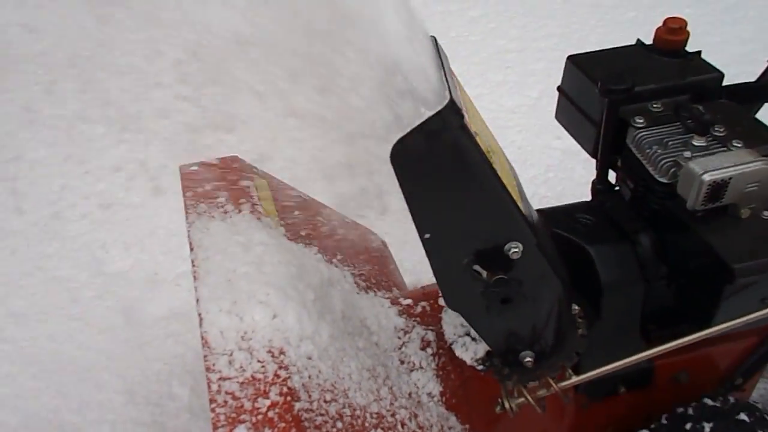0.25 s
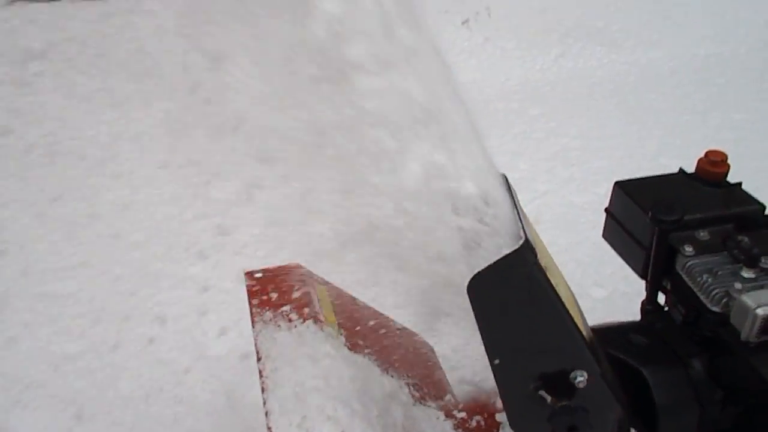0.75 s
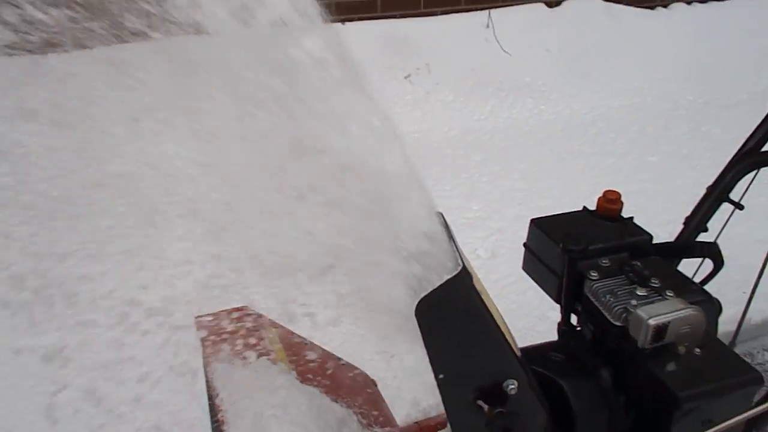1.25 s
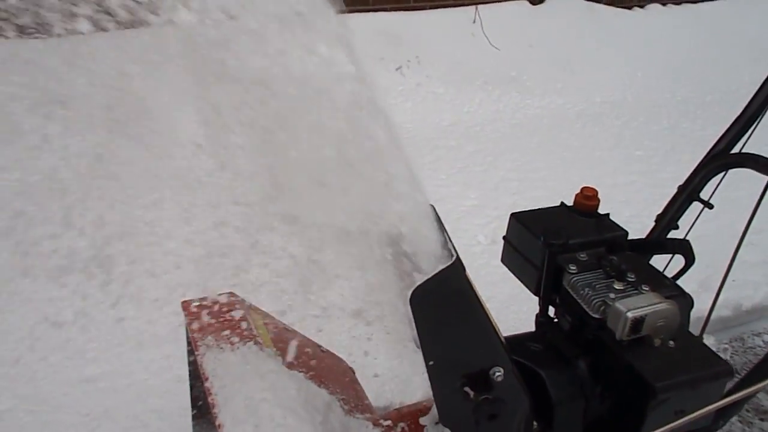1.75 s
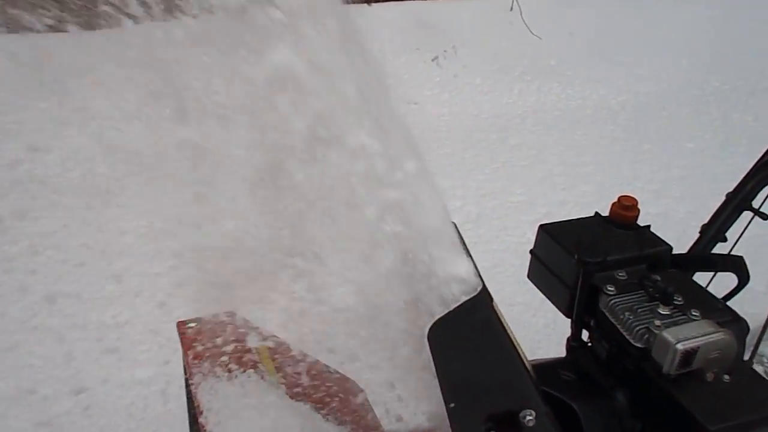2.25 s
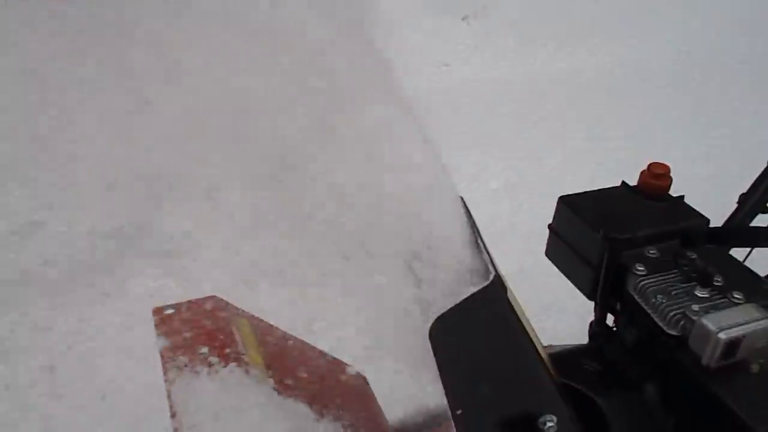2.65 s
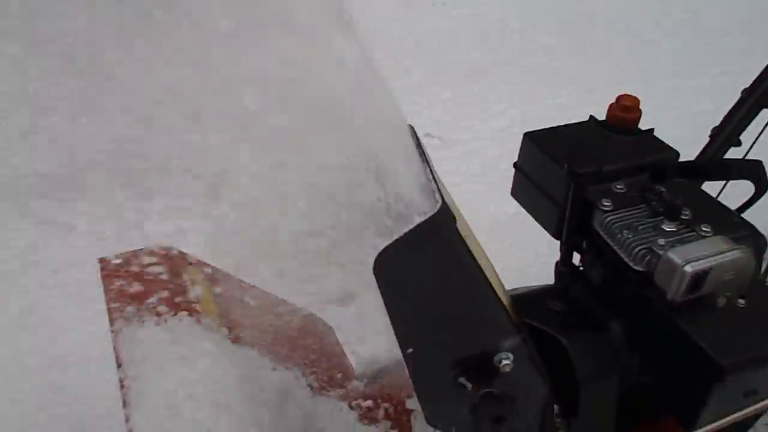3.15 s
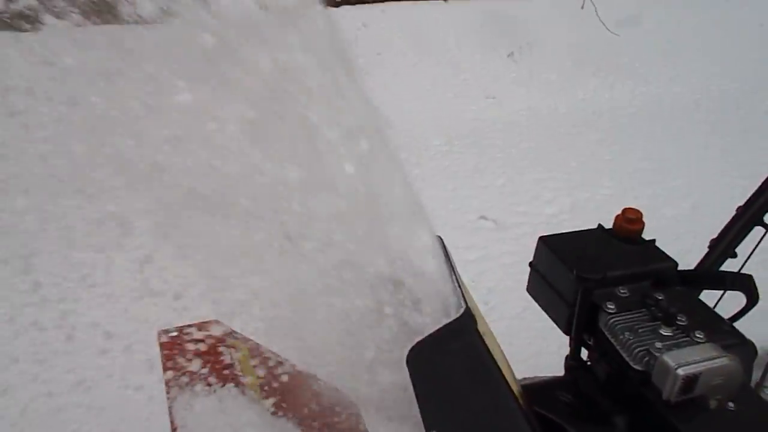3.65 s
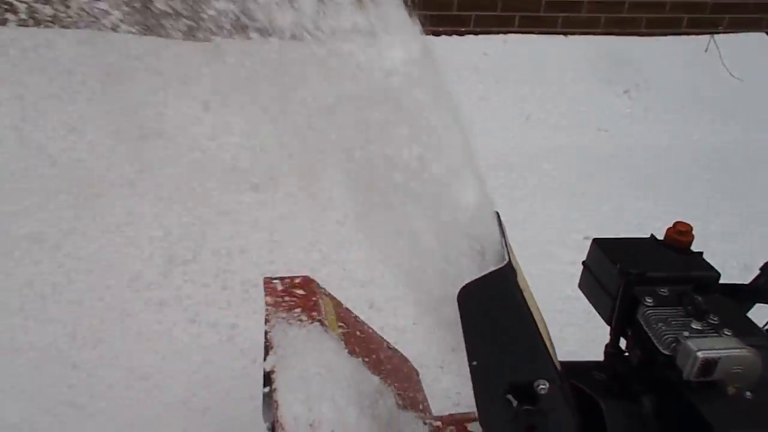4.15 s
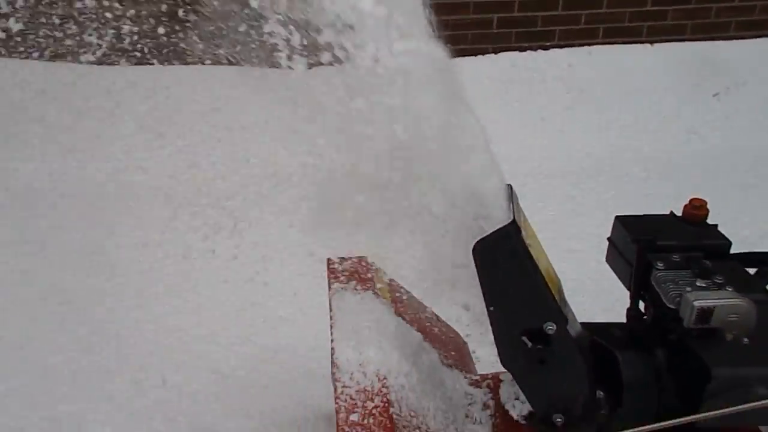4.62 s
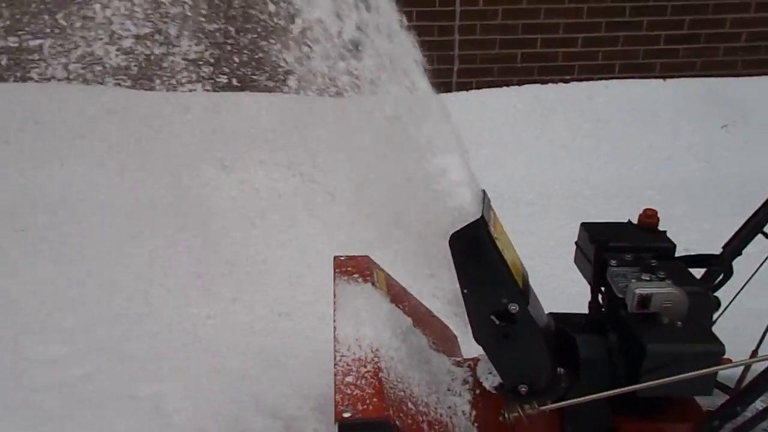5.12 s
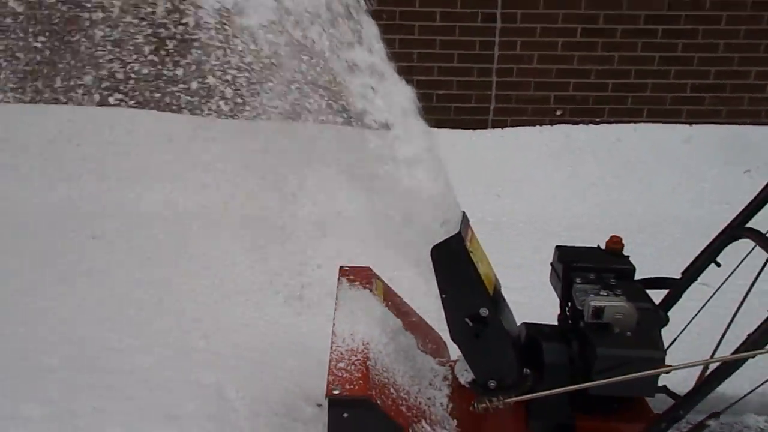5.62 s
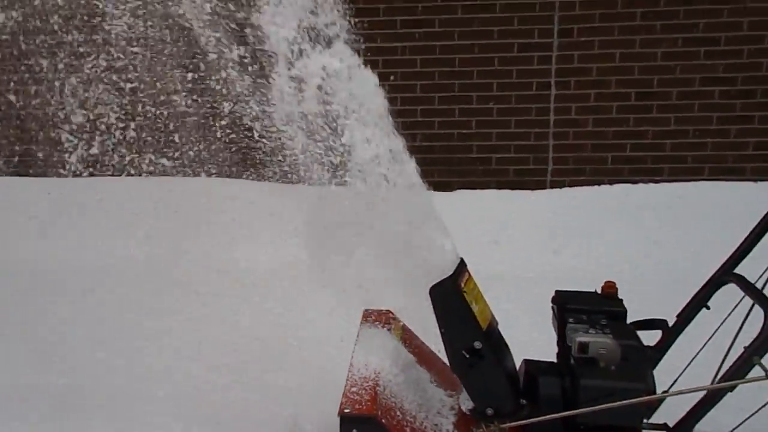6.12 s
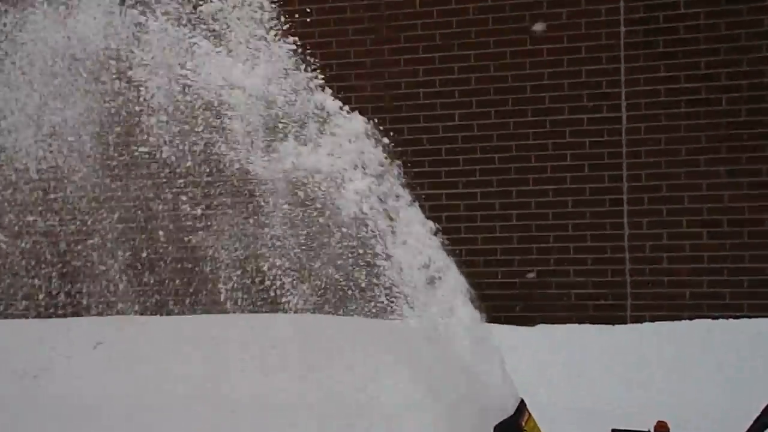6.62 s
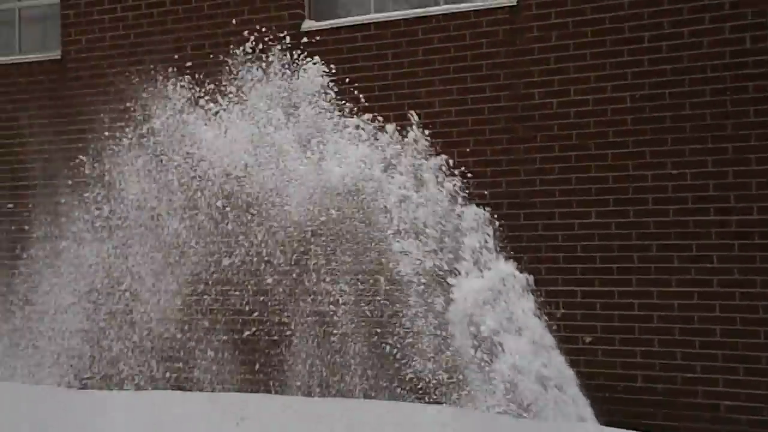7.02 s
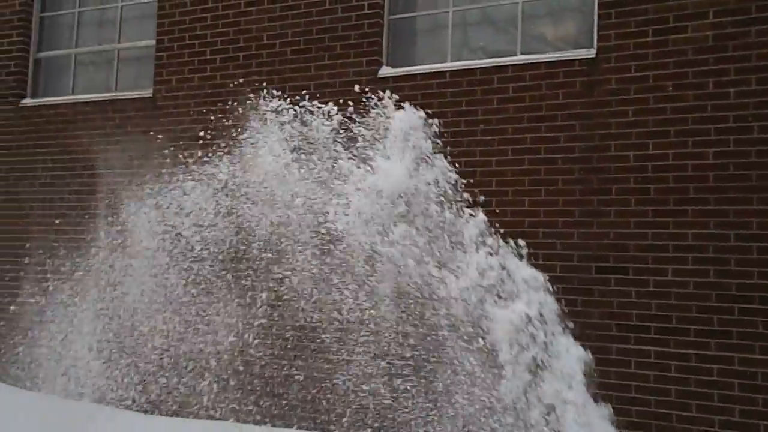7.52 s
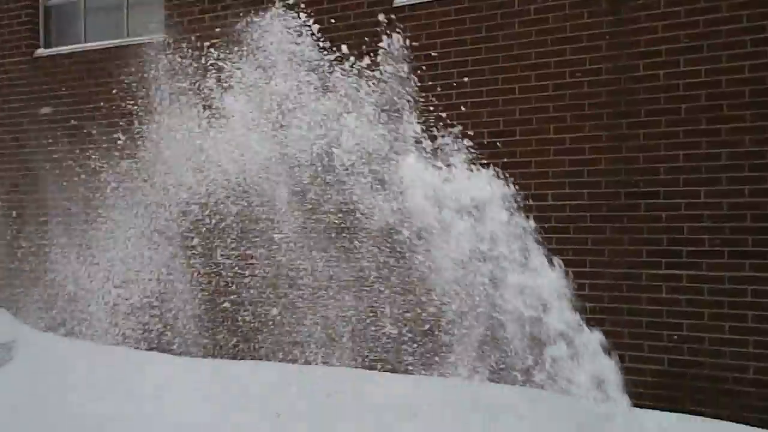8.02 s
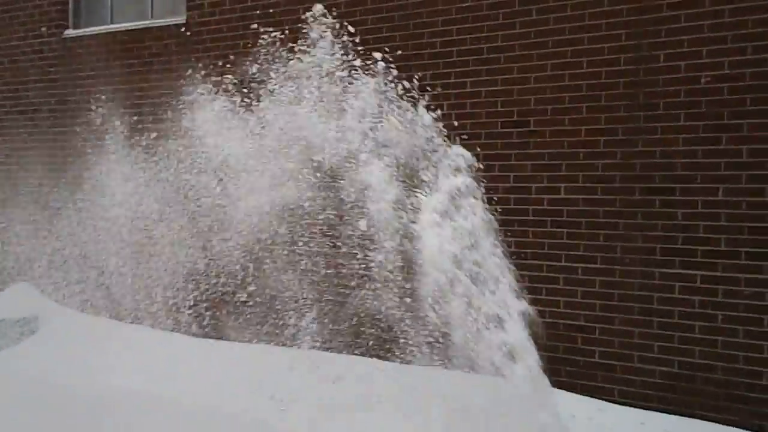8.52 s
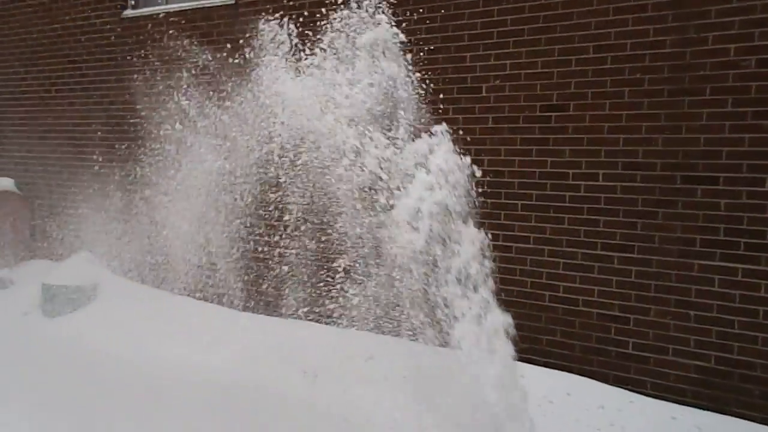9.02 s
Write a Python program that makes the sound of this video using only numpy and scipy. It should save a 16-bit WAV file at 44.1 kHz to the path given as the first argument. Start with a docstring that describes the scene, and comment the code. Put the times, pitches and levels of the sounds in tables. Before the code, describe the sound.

A snowblower runs close by outdoors for the whole nine seconds or so. Its single-cylinder engine holds a fast, even putter, about twenty-five beats a second, with thumping exhaust, metallic knocking and irregular bright snaps, most frequent in the first five seconds. Over it, snow rushes up the steel chute with a continuous gritty hiss and rattle. The machine swells slightly around 3.5 seconds and again from about 6.4 to 8. Lumps of ice tick against the chute now and then, most sharply at 5.3 seconds, and again near 6.7 and 7.6. A faint, thin, high squeak comes and goes, around 3 seconds and after 7. From about 5 seconds the microphone backs away and the reflection off a brick wall gently shifts the tone. Around 7 seconds it turns aside and the engine sounds a little hollower, still running strongly to the end.

```python
"""Beside a brick wall, in deep snow, a single-cylinder four-stroke snowblower is heard from close by.
Each cycle excites the resonances of block and muffler: a combustion knock, an exhaust thump with a snap
and a turbulent jet of gas, a valve clack. The impeller flings hissing snow and lumps of ice up the
resonant steel chute. Hard firings and lumps make a limiter duck. The microphone backs away, so the
wall's echo arrives later and later, and finally turns towards the plume."""
import sys
import numpy as np
from scipy import signal
from scipy.fft import rfft, irfft, next_fast_len
from scipy.io import wavfile
from scipy.ndimage import uniform_filter1d, minimum_filter1d

SR = 44100
rng = np.random.default_rng(int(sys.argv[2]) if len(sys.argv) > 2 else 0)


def unload_wav(signal):
    """Save mono or channel-first audio to the path in sys.argv[1] as 16-bit WAV at rate SR, clipped to [-1, 1]."""
    wavfile.write(
        sys.argv[1],
        SR,
        np.round(np.clip(np.atleast_2d(signal).T, -1, 1) * 32767).astype(np.int16),
    )


N = 408366
TIME = np.arange(N) / SR


def from_db(db):
    """Amplitude ratio of a level in decibels."""
    return 10 ** (np.asarray(db) / 20)


def unit_rms(x):
    """Normalisation to rms 1."""
    return x / np.sqrt(np.mean(x ** 2) + 1e-20)


def in_time(rows):
    """Linear interpolation of each column to every sample."""
    times, *columns = np.transpose(rows)
    return [np.interp(TIME, times, column) for column in columns]


def in_cycle(rows, cycles):
    """Periodic amplitude modulation: a gain of rms 1 that repeats every engine cycle."""
    phase, level_db = np.transpose(rows)
    return unit_rms(from_db(np.interp(cycles, phase, level_db, period=1)))


def drift(rate_hz):
    """Random fluctuation of rms 1, interpolated between Gaussian values."""
    points = rng.standard_normal(4000)
    return unit_rms(np.interp(TIME * rate_hz, np.arange(len(points)), points))


def coloured(x, spectrum):
    """Spectral shaping by a smooth curve over log frequency; rms 1."""
    hz, level_db = np.transpose(spectrum)
    size = next_fast_len(N + SR // 10)
    bin_hz = np.maximum(np.arange(size // 2 + 1) * SR / size, 1)
    gain = from_db(np.interp(np.log(bin_hz), np.log(hz), level_db))
    return unit_rms(irfft(rfft(x, size) * gain, size)[:N])


def resonance(x, hz, width_hz):
    """Damped resonator: a two-pole band-pass with unit peak gain."""
    radius = np.exp(-np.pi * width_hz / SR)
    feedback = [1, -2 * radius * np.cos(2 * np.pi * hz / SR), radius ** 2]
    return signal.lfilter(np.array([1, 0, -1]) * (1 - radius ** 2) / 2, feedback, x + 1e-18)


def body(x, modes):
    """Modal superposition: resonators driven in parallel; rms 1."""
    return unit_rms(sum(from_db(level_db) * resonance(x, hz, width) for hz, width, level_db in modes))


def strikes(times, spread_db, jitter_s):
    """Impulse train with Gaussian scatter in level and timing."""
    scatter = rng.standard_normal((len(times), 2))
    at = np.round((times + jitter_s * scatter[:, 0]) * SR).astype(int)
    inside = (at >= 0) & (at < N)
    return np.bincount(at[inside], from_db(spread_db * scatter[inside, 1]), N)


# spectrum of the mechanical noise: f/Hz, relative level/dB
RATTLE_SPECTRUM = [(25, -34), (60, -8), (90, 1.5), (140, 7.5), (300, -5), (650, 8.5), (900, 4), (1400, 2.5),
                   (2300, 1.5), (3500, 1.5), (5300, 4.5), (7000, -0.5), (9500, -1.5), (11000, -11)]
# its envelope: phase after the exhaust stroke/cycles, relative level/dB
RATTLE_ENVELOPE = [(.04, -2), (.16, 0), (.24, 1.5), (.33, -1), (.5, -1), (.62, 1.5), (.69, 3.5), (.8, 3),
                   (.92, 0)]
def rattle(cycles):
    """Modulated broadband noise: fan, gears and rushing snow, loudest on the power stroke."""
    rush = coloured(rng.standard_normal(N), RATTLE_SPECTRUM)
    flutter = from_db(1.4 * drift(rate_hz=180))
    return from_db(-21.5) * flutter * in_cycle(RATTLE_ENVELOPE, cycles) * rush


# spectrum of ice striking steel: f/Hz, relative level/dB
ICE_SPECTRUM = [(200, -46), (700, -8), (2000, -8), (4000, -2), (6700, 8), (9000, 3.5), (11000, -20)]
def grit(cycles, grains_per_s, size_spread_db, clump_db):
    """Shot noise: icy grains tick along the shaking chute, clumping as their rate fluctuates."""
    impacts = rng.random(N) < grains_per_s * from_db(clump_db * drift(rate_hz=120)) / SR
    sizes = from_db(size_spread_db * np.minimum(rng.exponential(1, N), 4))
    polarity = rng.choice([-1, 1], N)
    shaking = in_cycle(RATTLE_ENVELOPE, cycles) ** 2
    return from_db(-23) * coloured(impacts * sizes * polarity * shaking, ICE_SPECTRUM)


# partials of the crankshaft hum: harmonic number of the firing rate, level/dB
HUM_HARMONICS = [(2, -57), (4, -50), (5, -33.5), (6, -38.5), (7, -36.5), (20, -35.5), (21, -42)]
def hum(cycles):
    """Harmonic series phase-locked to the crankshaft, peaking just before the exhaust stroke."""
    phase = 2 * np.pi * (cycles + .044)
    return sum(np.sqrt(2) * from_db(level_db) * np.cos(round(harmonic) * phase)
               for harmonic, level_db in HUM_HARMONICS)


# blows within a cycle: t/s from the exhaust stroke, relative level/dB
BLOWS = [(-.0132, 9), (-.0097, -2.5), (-.0046, -6), (-.0004, 10), (.0092, 2.5), (-.0195, -32)]
# modes of the block and steel housing: f/Hz, bandwidth/Hz, relative level/dB
HOUSING_MODES = [(253, 22, 7.5), (338, 94, 19), (512, 98, -0.5), (1108, 19, 3), (1400, 250, 0.5),
                 (1550, 98, 2), (2190, 39, -10)]
# modes of the cylinder head: f/Hz, bandwidth/Hz, relative level/dB
HEAD_MODES = [(635, 41, 6.5), (707, 48, 1.5), (1090, 20, 2.5)]
def knocks(firings):
    """Impact excitation: combustion, piston and valves ring the block; combustion also rings the head."""
    blows = sum(from_db(level_db) * strikes(firings + offset_s, spread_db=3, jitter_s=.00003)
                for offset_s, level_db in BLOWS)
    # the high ring comes ahead of the low thump, so each putt falls in pitch
    combustion = strikes(firings - .0097, spread_db=1.2, jitter_s=.00003)
    return from_db(-27) * body(blows, HOUSING_MODES) + from_db(-33) * body(combustion, HEAD_MODES)


# modes of the muffler: f/Hz, bandwidth/Hz, relative level/dB
MUFFLER_MODES = [(303.5, 93, 28), (475, 190, -15)]
# modes of the exhaust pipe: f/Hz, bandwidth/Hz, relative level/dB
PIPE_MODES = [(1415, 340, 6), (1575, 130, 1), (2200, 29, 6), (2750, 130, 2)]
def exhaust(firings, turbulence_decay_s=.0018):
    """Cavity resonance: each puff cracks in the pipe, and its rounded pressure wave rings the muffler."""
    puffs = strikes(firings, spread_db=.7, jitter_s=.00002) + 1e-18
    pressure = signal.sosfilt(signal.butter(2, 1000, fs=SR, output="sos"), puffs)
    outflow = signal.lfilter([1], [1, -np.exp(-1 / (turbulence_decay_s * SR))], puffs)
    turbulence = outflow * rng.standard_normal(N)
    crack = from_db(-28.45) * body(puffs + .12 * turbulence, PIPE_MODES)
    thump = from_db(-21.95) * body(pressure, MUFFLER_MODES)
    return thump + crack


# spectrum of the gas jet: f/Hz, relative level/dB
JET_SPECTRUM = [(100, -31), (400, -19), (1200, -4), (3500, 2.5), (5500, 4), (7000, 15.5), (8400, 8.5),
                (10000, 10), (11200, -63)]
# its envelope: phase after the exhaust stroke/cycles, relative level/dB
JET_ENVELOPE = [(-.04, -67), (0, -2), (.032, 3.5), (.06, -2), (.11, -31), (.18, -13), (.25, -53)]
def jet(cycles):
    """Turbulent jet noise: gas tears through the muffler outlet just after the valve opens."""
    gas = coloured(rng.standard_normal(N), JET_SPECTRUM)
    flutter = from_db(1.4 * drift(rate_hz=25))
    return from_db(-23) * flutter * in_cycle(JET_ENVELOPE, cycles) * gas


# hard firings, most snapping far above the rest: t/s, peak level/dB
HARD_FIRINGS = [(0.33, 10.5), (0.37, 13), (0.45, 6), (0.57, 8.5), (0.69, 8.5), (1.05, 8), (1.28, 8.5),
                (1.4, 9.5), (1.64, 5.5), (1.88, 7.5), (2.07, 8.5), (2.11, 9.5), (2.19, 9), (2.27, 10.5),
                (2.39, 6), (2.51, 7.5), (2.55, 7.0), (2.67, 5), (2.82, 13), (2.9, 9), (2.94, 8.0),
                (2.98, 6), (3.02, 15), (3.14, 8.5), (3.26, 9), (3.3, 7), (3.57, 13), (3.73, 9),
                (3.77, 10.5), (3.81, 9.5), (3.93, 11.5), (4.09, 6.5), (4.13, 10.5), (4.64, -8), (4.72, 6.0),
                (4.76, 6.5), (4.8, 5.5), (4.92, 5), (5.63, 3.5), (6.26, 6.0), (6.46, 6), (7.01, 7.0),
                (7.41, 8), (7.53, 13), (7.96, 8.5), (8.2, -2), (8.4, 5), (8.56, 5), (8.91, 8.5),
                (9.07, 9.5), (9.11, 7.5)]
def snaps(firings, hz=7960, t60_s=.0011, delay_s=.0024, spread_db=4.5):
    """Impulse response of a heavily damped mode: a bright snap as the exhaust valve lets go."""
    peak_db = spread_db * np.minimum(rng.standard_normal(len(firings)), 1)
    for time_s, hard_db in HARD_FIRINGS:
        peak_db[np.argmin(np.abs(firings - time_s))] = hard_db
    clicks = np.bincount(((firings + delay_s) * SR).astype(int), from_db(peak_db), N)[:N]
    radius = from_db(-60 / (t60_s * SR))
    angle = 2 * np.pi * hz / SR
    return signal.lfilter([0, np.sin(angle)], [1, -2 * radius * np.cos(angle), radius ** 2], clicks + 1e-18)


# reflection from the brick wall: t/s, delay/s, amplitude ratio
WALL_ECHO = [(0, 0.0034, 0.16), (4.6, 0.0037, 0.23), (5.25, 0.0048, 0.22), (5.65, 0.0065, 0.42),
             (6.15, 0.0071, 0.42), (6.8, 0.0105, 0.39), (7.9, 0.012, 0.41), (9.26, 0.013, 0.12)]
def wall(direct, cutoff_hz=640):
    """Comb filtering: as the echo's delay grows, the low harmonics reinforce and cancel in turn."""
    delay_s, ratio = in_time(WALL_ECHO)
    # snow banked against the wall absorbs the treble
    dulled = signal.sosfilt(signal.butter(2, cutoff_hz, fs=SR, output="sos"), direct)
    return direct + ratio * np.interp(TIME - delay_s, TIME, dulled)


# modes of the chute: f/Hz, bandwidth/Hz, relative gain
CHUTE_MODES = [(2180, 244, 0.86), (4970, 510, 0.27)]
def chute_ring(machine):
    """Forced vibration: the machine makes the chute's sheet steel ring and sizzle."""
    return sum(gain * resonance(machine, hz, width) for hz, width, gain in CHUTE_MODES)


# lumps of ice hitting the chute: t/s, initial level/dB, decay time/s
ICE_LUMPS = [(0.298, -4, 0.0039), (0.79, -5, 0.002), (1.832, -15, 0.0097), (1.858, -5, 0.0044),
             (4.465, -9, 0.0017), (4.958, -16, 0.0036), (5.249, -1.5, 0.0078), (5.285, 11, 0.0031),
             (6.446, -14, 0.0026), (6.645, 1.5, 0.0015), (6.69, 5.5, 0.0019), (6.779, -22, 0.0037),
             (7.003, -11, 0.0042), (7.557, 4, 0.0017), (7.612, 5.5, 0.0015), (7.617, -11, 0.0064)]
def lumps():
    """Brittle fracture: each lump shatters on the steel in a bright, exponentially decaying noise burst."""
    envelope = np.zeros(N)
    age = TIME[:SR // 10]
    for time_s, level_db, decay_s in ICE_LUMPS:
        start = int(time_s * SR)
        envelope[start:start + len(age)] += from_db(level_db) * np.exp(-age / decay_s)
    return envelope * coloured(rng.standard_normal(N), ICE_SPECTRUM)


# a thin squeak coming and going: t/s, level/dB
SQUEAK_LEVEL = [(0, -44), (2, -44), (2.9, -25), (3.6, -39), (5.8, -33), (6.5, -30), (6.9, -37), (7.2, -25),
                (7.45, -29), (7.9, -38), (9.26, -30)]
def squeak(cycles):
    """Friction excitation: a turning part rubs and chirps three times a cycle, never twice alike."""
    (level_db,) = in_time(SQUEAK_LEVEL)
    rub_phase = cycles + .012 * drift(rate_hz=40) + .2
    rubs = np.maximum(np.cos(2 * np.pi * 3 * rub_phase), 0) ** 3
    chirp = body(rng.standard_normal(N), modes=[(6890, 42, 9.5), (9800, 130, -7)])
    return from_db(level_db + 3 * drift(rate_hz=77)) * unit_rms(rubs) * chirp


# off-axis peaks and dips: f/Hz, bandwidth/Hz, gain added
OFF_AXIS_BANDS = [(266, 330, -0.34), (374, 65, 0.35), (494, 70, 0.57), (693, 49, -0.65), (930, 150, 0.54),
                  (1400, 190, 0.42), (2037, 540, -0.91), (3030, 1500, 0.52), (3880, 820, 0.72),
                  (4220, 2250, -0.67), (5660, 880, 0.99), (7820, 1080, -0.54)]
def turn_away(x, start_s=6.58, end_s=7.2):
    """Off-axis colouration: the machine sounds hollow as the microphone swings to the plume."""
    turned = np.interp(TIME, [start_s, end_s], [0, 1])
    for hz, width, gain in OFF_AXIS_BANDS:
        x = x + turned * gain * resonance(x, hz, width)
    return x


# firing rate, hunting around the governor's setting: t/s, f/Hz
FIRING_RATE = [(0, 25.24), (1.03, 25.294), (2.51, 25.349), (3.43, 25.283), (4.36, 25.289), (4.5, 25.475),
               (4.78, 25.102), (5.06, 25.312), (6.2, 25.323), (6.5, 25.25), (7.32, 25.273), (7.98, 25.42),
               (8.17, 25.11), (8.57, 25.357), (8.74, 25.154), (9.26, 25.326)]
# the machine grows louder as it bites into more snow: t/s, level/dB
SNOW_LOAD = [(0, 1.5), (2.3, 2.5), (3.25, 1), (3.5, 4.5), (4.4, 3), (5.6, 0.5), (6.4, 3.5), (7.8, 4),
             (8.5, 0.5), (9.26, 3.5)]
# pickup at the moving microphone: t/s, then level/dB of housing, jet, hum and chute ring
PICKUP = [(0, 5.5, 2.5, -2.5, -1), (1.7, 5, 2.5, -3.5, -7), (3.1, 4.5, 5, -4, 1), (3.7, 4, 2, 1, -13),
          (4.4, 6, 1, -2, -4), (5.1, 3, 0, 2, 4), (5.7, 2, -3, 2, 5), (6.25, 3.5, -2.5, 4.5, 6.5),
          (6.75, -1, -5.5, 5, -0.5), (7.2, 5, 6.5, 4, -6), (8.1, 5, 0.5, 5.5, 6.5), (9.26, 1.5, 3, 3, 3.5)]
def scene():
    """Superposition of engine, snow and wall echo at the moving microphone."""
    (firing_hz,), (load_db,) = in_time(FIRING_RATE), in_time(SNOW_LOAD)
    housing_db, jet_db, hum_db, ring_db = in_time(PICKUP)
    cycles = np.cumsum(firing_hz) / SR - .43   # whole numbers mark the exhaust strokes
    firings = np.interp(np.arange(np.floor(cycles[-1]) + 1), cycles, TIME)
    engine = from_db(.71 * load_db) * (exhaust(firings) + from_db(housing_db) * knocks(firings))
    # the engine's thumps carry little deep bass
    engine = signal.sosfilt(signal.butter(2, 125, "high", fs=SR, output="sos"), engine)
    engine = wall(engine + from_db(hum_db) * hum(cycles))
    grains = grit(cycles, grains_per_s=3000, size_spread_db=3.5, clump_db=4)
    snow = from_db(load_db) * (rattle(cycles) + grains + squeak(cycles))
    machine = engine + snow + from_db(jet_db) * jet(cycles) + lumps()
    machine = machine + from_db(ring_db) * chute_ring(machine)
    return (turn_away(machine) + snaps(firings))[None]


def limiter(x, threshold_db=1, hold_s=.029, release_s=.018):
    """Peak limiting: the gain drops at once on a peak, holds, then recovers exponentially."""
    over_db = np.maximum(20 * np.log10(np.abs(x) + 1e-9) - threshold_db, 1e-6)
    hold = int(hold_s * SR)
    held_db = -minimum_filter1d(-over_db, hold, origin=(hold - 1) // 2)
    release = TIME / release_s
    duck_db = np.exp(np.maximum.accumulate(np.log(held_db) + release, axis=-1) - release)
    return x * from_db(-uniform_filter1d(duck_db, size=40))


def record(dry):
    """Limiting and soft saturation, then a narrow treble notch and a steep low-pass."""
    limited = limiter(dry)
    rounded = limited / (1 + (limited / 1.13) ** 4) ** (1 / 4)
    notched = rounded - .95 * resonance(rounded, hz=7680, width_hz=380)
    return signal.sosfilt(signal.ellip(10, .3, 70, 11200, fs=SR, output="sos"), notched)


dry = scene()
out = record(dry)
unload_wav(out)
```